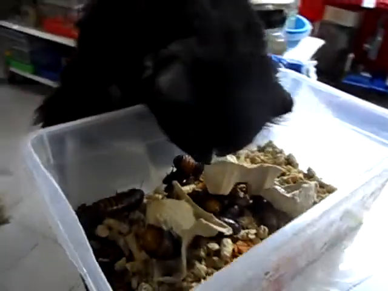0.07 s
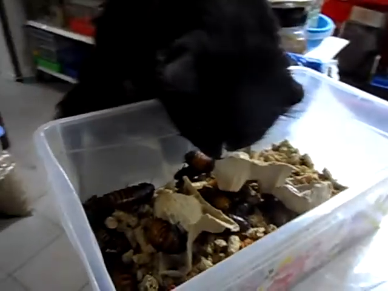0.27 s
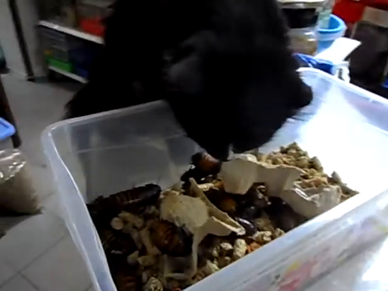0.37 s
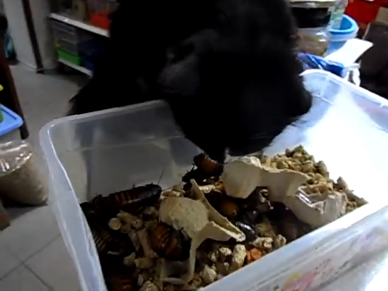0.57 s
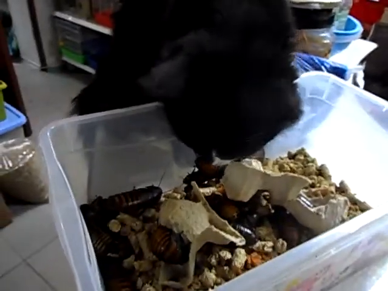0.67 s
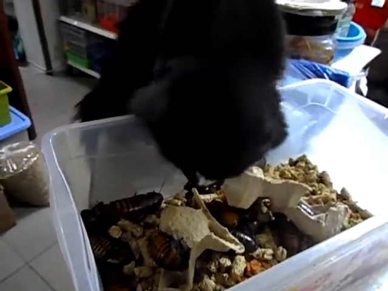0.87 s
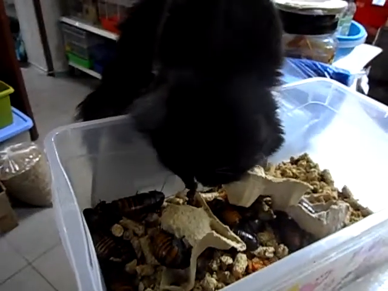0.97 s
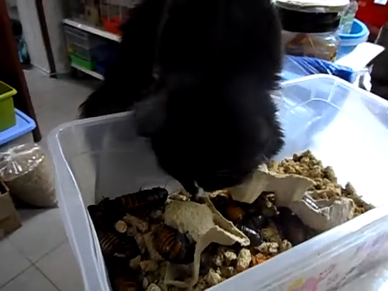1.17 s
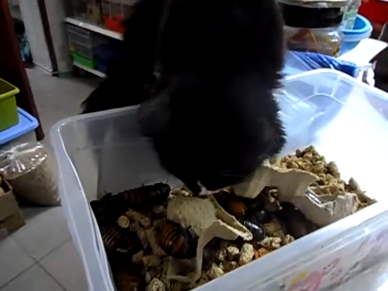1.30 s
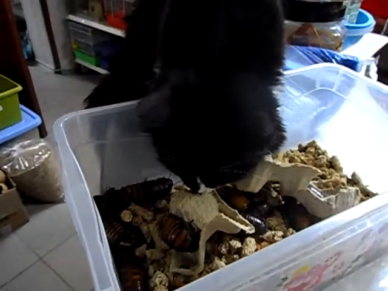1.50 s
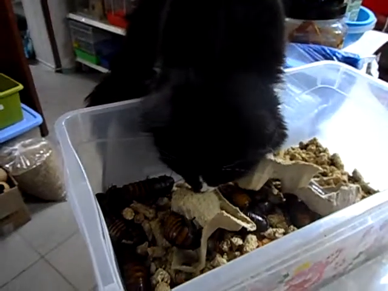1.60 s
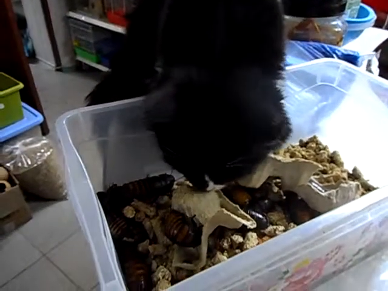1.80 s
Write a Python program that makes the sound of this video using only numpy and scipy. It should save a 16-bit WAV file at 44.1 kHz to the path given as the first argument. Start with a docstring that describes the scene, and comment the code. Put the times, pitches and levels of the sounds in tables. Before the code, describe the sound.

Short, airy hisses come from big cockroaches in a plastic tub, close to the microphone, growing somewhat louder and brighter with brief whistling edges. Litter stirs faintly beneath them, and a small room's soft rumble remains at the end.

```python
"""Inside a plastic bin, large cockroaches hiss in short bursts while a black furry animal noses at them.
Each hiss is a turbulent jet of air with two broad resonances; some narrow into a brief whistle.
The bin's walls colour the hisses and the litter stirs faintly. A small quiet room gives both
a short tail, over a bed of low rumble, air and hum."""
import sys
import numpy as np
from scipy import signal
from scipy.fft import rfft, irfft
from scipy.io import wavfile

SR = 44100
rng = np.random.default_rng(int(sys.argv[2]) if len(sys.argv) > 2 else 0)


def dump(signal):
    """Clip the signal to [-1, 1] and save it as 16-bit WAV at the path in sys.argv[1]."""
    limited = np.clip(np.atleast_2d(signal).T, -1, 1)
    pcm = np.round(limited * 32767).astype(np.int16)
    wavfile.write(sys.argv[1], SR, pcm)


N = 81585


def hiss(length, level_db, swell_db, low_hz, low_db, high_hz, high_db, tilt_db):
    """A fluttering jet of air, shaped by two broad resonances; it brightens as it opens."""
    # The jet's basic tone. Each row: frequency in Hz, relative level in dB.
    jet_spectrum = [(400, -50), (1100, -42), (1450, -20.5), (1850, -13), (2300, -9.5), (2800, -7.5),
                    (4100, -2), (5800, 1), (7300, -0.5), (9000, -3.5), (10500, -10), (12500, -19),
                    (15500, -31)]
    low_width_hz, high_width_hz = 330, 410
    dull_db_per_octave, brighten_s = 6.5, 0.016
    patch_db, patch_hz, patch_s = 2.5, 400, 0.0032
    flutter_db, flutter_hz = 1.39, 131
    f, t, white = signal.stft(rng.standard_normal(16384), SR, nperseg=256, noverlap=192)
    low = low_db * np.exp(-.5 * ((f - low_hz) / low_width_hz) ** 2)
    high = high_db * np.exp(-.5 * ((f - high_hz) / high_width_hz) ** 2)
    octaves = np.log2(f / high_hz + .1)
    colour = curve_at(jet_spectrum, f) + low + high + tilt_db * octaves
    opening = -dull_db_per_octave * np.outer(np.maximum(octaves + .5, 0), np.exp(-t / brighten_s))
    # The colour shifts in small patches of frequency and time.
    patches = unit_rms(blur(f, patch_hz) @ rng.standard_normal(white.shape) @ blur(t, patch_s))
    shaped = white * amp(colour[:, None] + opening + patch_db * patches)
    jet = unit_rms(signal.istft(shaped, SR, noverlap=192)[1])
    flutter = noise(lambda f: 1 / (1 + (f / flutter_hz) ** 2) * f / (f + 25))
    return amp(level_db + flutter_db * flutter) * puff(jet, length, swell_db)


def whistle(length, hz, glide, level_db, wander_hz=235, wander_rate_hz=222):
    """The jet briefly locks onto one unsteady pitch."""
    wander = noise(lambda f: 1 / (1 + (f / wander_rate_hz) ** 2))
    glide_time = np.minimum(np.arange(len(wander)) / SR, length)
    cycles = np.cumsum(hz + glide * glide_time + wander_hz * wander) / SR
    return amp(level_db) * puff(unit_rms(np.sin(2 * np.pi * cycles)), length)


def cockroaches():
    """Bursts of forced air: each hiss from its own spot in the bin, with the whistles laid on top."""
    # Each row: start and hold in seconds, level and swell in dB, low resonance in Hz, its gain in dB,
    # high resonance in Hz, its gain in dB, tilt in dB per octave.
    hisses = [ (0.198, 0.037, -34.5, 5.5, 2740, 8.5, 5050, 4.5, 0.5),
              (0.307, 0.056, -34.5, 5.5, 2930, 8, 5140, 4, -1),
              (0.501, 0.033, -26, 2, 2920, 3, 4910, 7.5, -0.66),
              (.665, 0.048, -29.5, -3, 2720, 8, 4900, 6, -0.5),
              (0.724, 0.032, -36.5, 2.5, 2700, 14.5, 5430, -6, -3),
              (0.753, 0.023, -30.5, -3.5, 3440, 12, 4900, 4, 2),
              (0.908, 0.055, -30, 9, 3220, 3.5, 4970, -1.5, -1.5),
              (0.982, .025, -24.5, -3, 3250, 5.5, 5900, 8.5, 2),
              (1.163, 0.039, -24.5, 1.5, 3400, -1, 4910, 7.5, 1.5),
              (1.202, 0.032, -23.5, 4, 3510, 9, 6700, 10, 4),
              (1.356, 0.024, -33.5, 8, 2430, 10, 5030, 5, 2),
              (1.378, 0.043, -25, -6, 3450, -2, 5240, 10.5, -2),
              (1.418, 0.059, -29.5, 5, 3380, 7.5, 6240, 5.5, 1.5)]
    # Each row: start and hold in seconds, pitch in Hz, glide in Hz per second, level in dB.
    whistles = [ (0.214, 0.012, 3040, -3000, -56), (0.354, 0.018, 3260, 0, -40),
                (0.663, 0.029, 2410, 0, -52), (.727, .022, 2700, -16000, -46),
                (.744, .006, 5200, -10000, -35), (0.752, 0.0049, 5450, 0, -33.5),
                (0.933, 0.016, 3310, -2, -34), (0.941, 0.036, 4750, 0, -34.5),
                (1.179, 0.051, 5074, 1004, -30), (1.386, 0.078, 5210, 3, -38.5),
                (1.426, 0.006, 6280, 0, -25), (1.464, 0.0086, 6620, -28000, -20.5)]
    out = np.zeros(N)
    for start, *shape in hisses:
        add(out, start, plastic_bin(hiss(*shape)))
    for start, *shape in whistles:
        add(out, start, whistle(*shape))
    return out


def rustles():
    """Faint scuffs of litter and egg carton, and soft bumps on the bin: puffs of band noise."""
    # Each row: start and hold in seconds, band centre and width in Hz, level in dB.
    scuffs = [ (.008, 0.022, 2150, 810, -52.5), (.045, .018, 2480, 300, -59),
              (0.054, 0.025, 1190, 250, -57), (0.092, 0.0078, 2520, 1140, -49), (.370, 0.17, 617, 800, -60),
              (.430, 0.057, 4900, 6470, -53.5), (1.106, 0.064, 55, 50, -51), (1.108, .005, 675, 500, -48),
              (1.147, 0.0072, 9600, 6000, -56.5), (1.682, .008, 4140, 390, -61)]
    out = np.zeros(N)
    for start, length, hz, width, db in scuffs:
        band = noise(lambda f: 1 / (1 + (2 * (f - hz) / width) ** 2))
        add(out, start, amp(db) * puff(band, length))
    return out


def plastic_bin(sound, count=24, wet_db=-2.5, span_s=0.012, fade_s=0.012):
    """The direct sound and a quick cluster of reflections between the walls."""
    delays = span_s * (np.arange(count) + 1 + rng.random(count)) / count
    bounces = rng.choice([-1., 1.], count) * np.exp(-delays / fade_s)
    gains = amp(wet_db) * bounces / np.linalg.norm(bounces)
    out = sound.copy()
    for delay, gain in zip(delays, gains):
        add(out, delay, gain * sound)
    return out / np.sqrt(1 + amp(wet_db) ** 2)


def room_tail(sound, wet_db=-11, build_s=0.008):
    """The small room's short diffuse tail, whose treble dies first."""
    # Each row: frequency in Hz, seconds to fade by 60 dB.
    decay_times = [(500, 0.3), (3000, 0.24), (6500, 0.18), (10000, 0.23), (15000, 0.12)]
    hz, t, white = signal.stft(rng.standard_normal(SR // 2), SR, nperseg=256)
    decay = amp(-60 * t / curve_at(decay_times, hz)[:, None])
    tail = signal.istft(white * decay * np.minimum(t / build_s, 1), SR)[1]
    return amp(wet_db) * signal.fftconvolve(sound, tail / np.linalg.norm(tail))[:N]


def room_tone(air_follow=0.27, rumble_edge_hz=270):
    """Low rumble that swells, then settles; the room's air follows it only a little."""
    # The bed's colour. Each row: frequency in Hz, relative level in dB.
    bed_spectrum = [(15, -32), (26, -2.5), (37, 1), (56, 1), (74, -17.5), (100, -9), (140, -15.5),
                    (250, -19), (500, -19.5), (1100, -20.5), (2200, -25.5), (5000, -30.5), (9500, -27),
                    (12500, -36.5), (15500, -45)]
    # The bed's fader ride. Each row: time in seconds, gain in dB.
    ride = [(0, -52.5), (.55, -49), (1.15, -49), (1.55, -54), (1.85, -55.5)]
    bed = noise(lambda f: amp(curve_at(bed_spectrum, f)), size=N)
    hz = np.fft.rfftfreq(N, 1 / SR)
    rumble = irfft(rfft(bed) / (1 + (hz / rumble_edge_hz) ** 2), N)
    air = bed - rumble
    rumble_db = np.interp(np.arange(N) / SR, *np.transpose(ride))
    air_db = rumble_db.mean() + air_follow * (rumble_db - rumble_db.mean())
    return rumble * amp(rumble_db) + air * amp(air_db)


def hum(waver_hz=4.4):
    """Faint wavering low tones in the room."""
    # Each row: pitch in Hz, level in dB.
    tones = [(36.5, -65), (57, -62.5), (100, -69.5), (290, -76), (398, -72.5)]
    t = np.arange(N) / SR
    out = np.zeros(N)
    for hz, db in tones:
        phase_drift = noise(lambda f: 1 / (1 + (f / waver_hz) ** 4), size=N)
        out += amp(db) * unit_rms(np.sin(2 * np.pi * hz * t + phase_drift))
    return out


def puff(sound, length, swell_db=0, attack_s=0.0086, release_s=0.015):
    """Opens quickly, rises or sinks by swell_db while held, then dies away."""
    t = np.arange(len(sound)) / SR
    swell = amp(swell_db * (np.minimum(t / length, 1) - .5))
    attack = np.minimum(t / attack_s, 1)
    release = np.exp(-np.maximum(t - length, 0) / release_s)
    return sound * swell * attack * release


def noise(gain, size=16384):
    """Noise of rms 1 whose spectrum is the function gain(Hz)."""
    white = rfft(rng.standard_normal(size))
    return unit_rms(irfft(white * gain(np.fft.rfftfreq(size, 1 / SR)), size))


def amp(db):
    """Decibels to linear gain."""
    return 10 ** (np.asarray(db) / 20)


def unit_rms(x):
    """Scales to an rms of 1."""
    return x / np.sqrt(np.mean(x ** 2) + 1e-20)


def curve_at(points, hz):
    """Reads a curve on a log-frequency axis."""
    f, value = np.transpose(points)
    return np.interp(np.log(hz + 1), np.log(f), value)


def blur(axis, width):
    """Matrix that smooths over neighbouring times or frequencies."""
    return np.exp(-.5 * ((axis[:, None] - axis) / width) ** 2)


def add(mix, start, sound):
    """Mixes a sound in at its start time."""
    part = mix[max(round(start * SR), 0):][:len(sound)]
    part += sound[:len(part)]


def scene():
    """Hisses and rustles up close, their room tail, and the quiet bed underneath, in mono."""
    near = cockroaches() + rustles()
    return (near + room_tail(near) + room_tone() + hum())[None]


def record(dry, cutoff_hz=15780):
    """A steep low-pass trims the very top of the treble."""
    lowpass = signal.firwin(801, cutoff_hz, window=("kaiser", 9), fs=SR)
    return signal.oaconvolve(dry, lowpass[None], "same")


dry = scene()
out = record(dry)
dump(out)
```